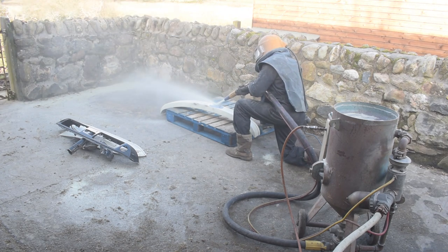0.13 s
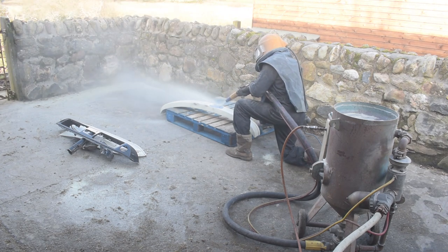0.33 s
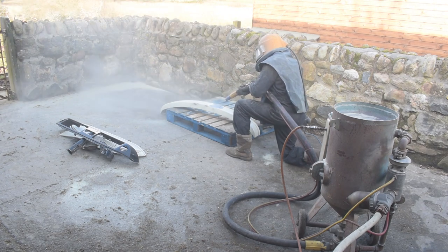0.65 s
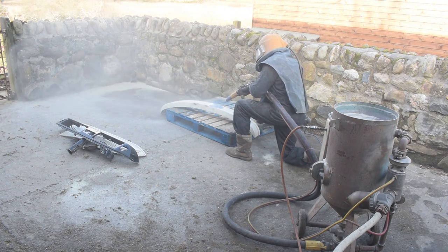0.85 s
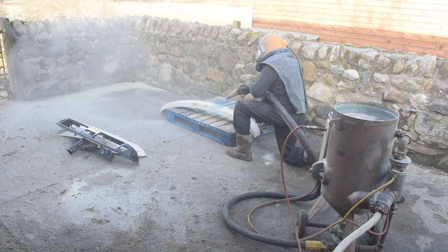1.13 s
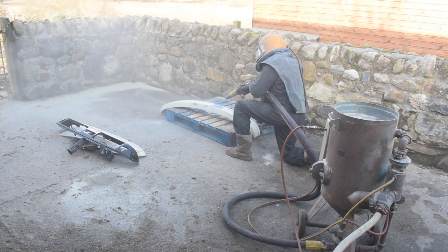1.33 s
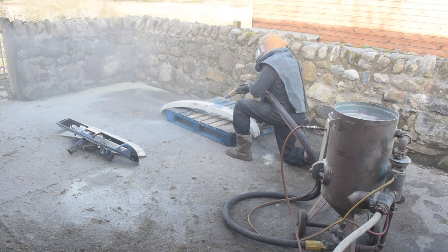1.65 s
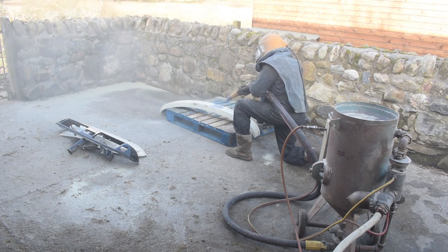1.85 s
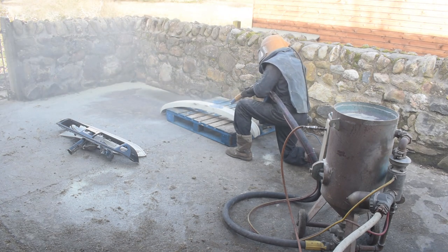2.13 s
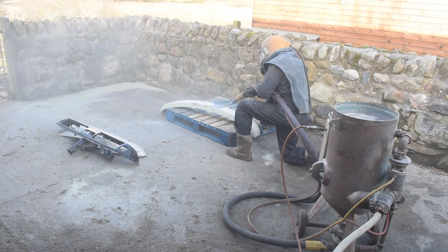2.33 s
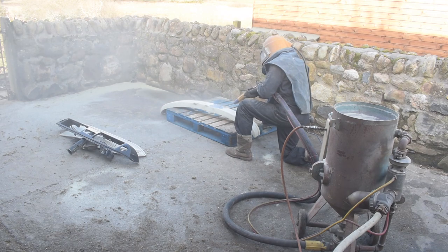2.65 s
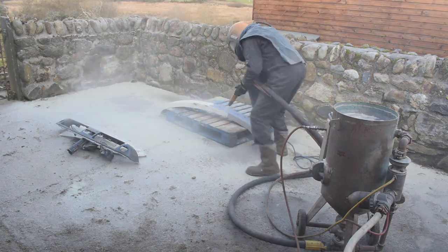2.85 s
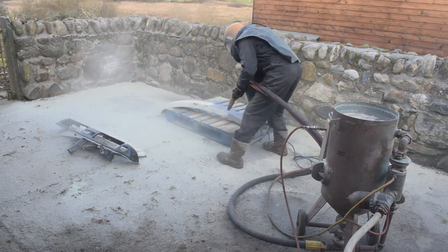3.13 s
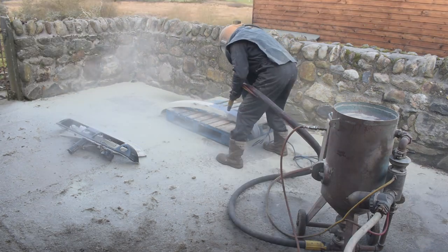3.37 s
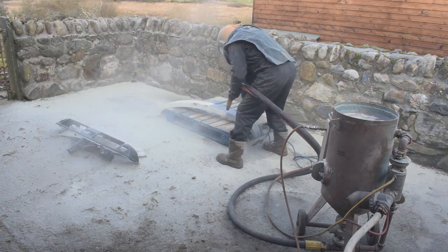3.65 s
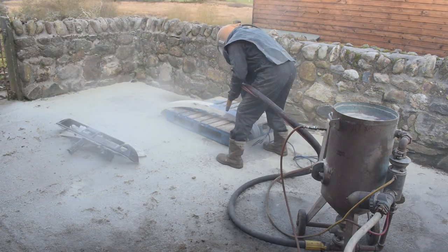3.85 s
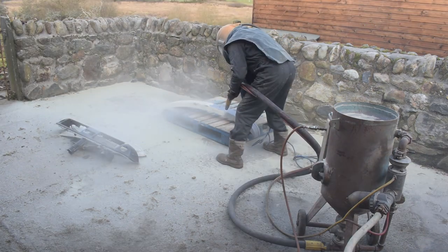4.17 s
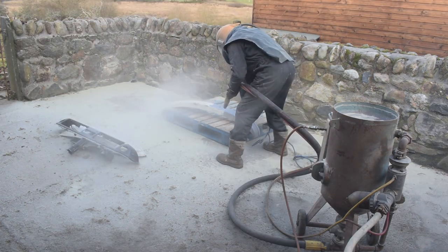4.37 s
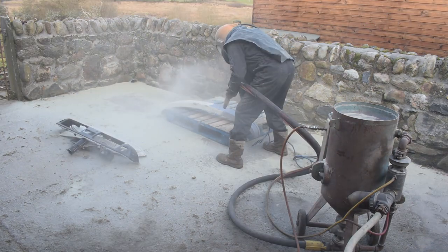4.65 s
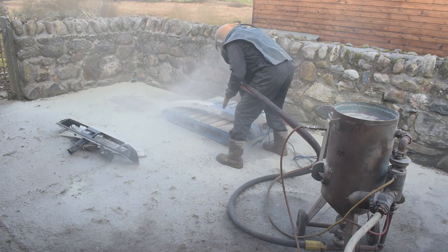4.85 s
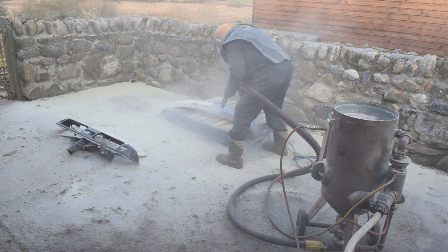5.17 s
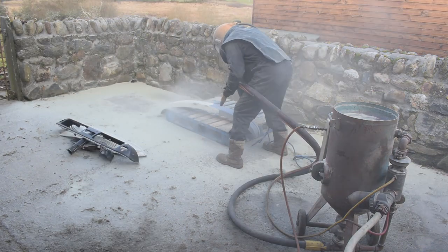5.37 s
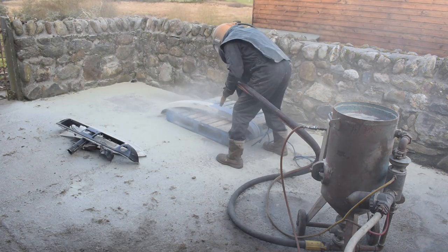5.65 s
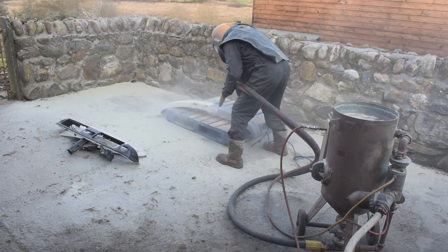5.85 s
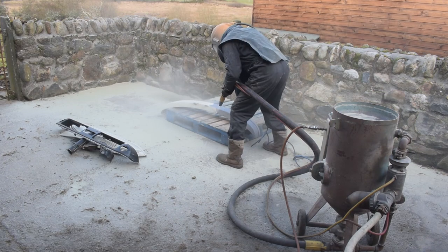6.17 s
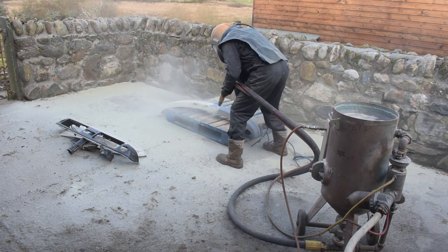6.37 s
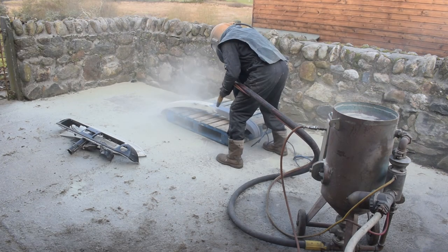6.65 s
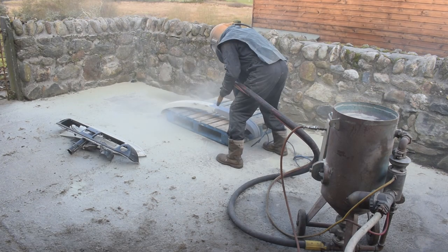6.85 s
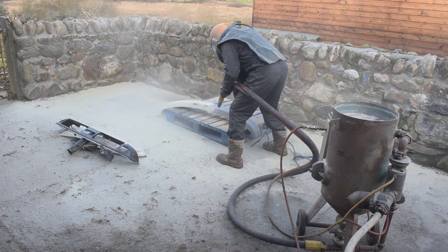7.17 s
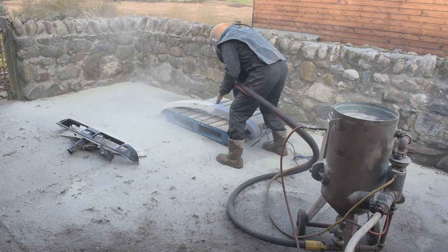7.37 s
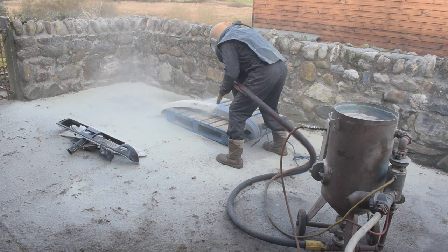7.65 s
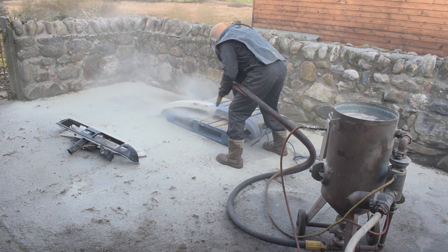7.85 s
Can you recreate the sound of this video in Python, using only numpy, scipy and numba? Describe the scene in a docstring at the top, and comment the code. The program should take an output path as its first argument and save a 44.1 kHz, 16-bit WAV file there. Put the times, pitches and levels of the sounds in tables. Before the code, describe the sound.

A loud, steady, bright hiss of sandblasting on a metal panel outdoors, beginning and ending with a duller air rush over compressor hum.

```python
"""A sandblasting jet plays on a car panel in a stone-walled yard.
Filtered noise makes its hiss and roar; resonances ring the panel and its hollows as the aim wanders.
At the start and near the end the hiss falls away, leaving a duller rush of air.
Then the compressor's hum, made of wavering harmonics and puffs of noise, stands out.
Short whistles from the panel edges and a few dull low bumps join in."""
import sys
import numpy as np
from scipy import signal
from scipy.fft import rfft, irfft, next_fast_len
from scipy.io import wavfile
from scipy.ndimage import uniform_filter1d
from numba import njit

SR = 44100
rng = np.random.default_rng(int(sys.argv[2]) if len(sys.argv) > 2 else 0)


def wav_record(signal):
    """Record a signal, one row per channel, as 16-bit PCM in the file named by sys.argv[1]."""
    frames = np.transpose(np.atleast_2d(signal))
    bounded = np.clip(frames, -1, 1)
    # unit amplitude maps onto the largest positive 16-bit level
    quanta = np.round(bounded * 32767).astype(np.int16)
    wavfile.write(sys.argv[1], SR, quanta)


N = 353238
TIME = np.arange(N) / SR

# slow drift of the jet as the worker shifts, before the changes and the lifts added in each layer: # [t/s,
# spray level/dB, impact level/dB, impact centre f/Hz, roar level/dB]
JET_DRIFT = [(0.5, -15.5, -12, 3350, -22.5), (1.2, -14.5, -11.5, 3640, -22.5), (1.8, -15, -11, 3730, -24.5),
             (2.1, -15, -12.5, 3800, -20.5), (2.7, -14, -13.5, 3740, -20.8), (3.1, -17, -11, 3380, -20.5),
             (3.65, -14, -11.5, 3970, -20.5), (3.9, -15, -12, 3850, -22), (4.45, -13, -10.5, 4030, -20),
             (4.7, -17, -13, 3680, -21.5), (5.15, -15.3, -10.5, 3650, -21.5), (5.5, -17, -10.5, 3550, -23),
             (6.05, -16, -10.3, 3470, -20.5), (6.75, -14, -10, 3610, -22.5), (7.05, -15.5, -11, 3250, -22),
             (7.6, -16, -10, 3150, -24)]
# how each noise of the jet responds to these changes: [change with air alone/dB, in the surge/dB, # in the
# dip/dB, share of a slip's fall/1, share of a dig's rise/1]
SPRAY_RESPONSE = (-10.5, 5.5, -12, 0.93, -0.11)
IMPACT_RESPONSE = (-8.5, 5.5, -17.5, 1.08, 0.2)
ROAR_RESPONSE = (0.5, 12.5, -8.5, 0.17, 1.12)
BUFFET_RESPONSE = (-6, 7, -11, -0.2, .5)
# the jet slips off the panel and the hiss fades: [t/s, half length/s, depth/dB]
SLIPS = [(.76, 0.068, 2.5), (3.22, 0.046, 3.5), (3.39, 0.033, 4), (3.5, 0.036, 6), (4.09, 0.07, 11),
         (4.31, 0.054, 3.5), (4.76, 0.051, 2), (4.96, 0.058, 3), (5.62, 0.053, 2.5), (6.22, 0.075, 8),
         (6.44, 0.094, 11.5), (7.0, 0.091, 2.5), (7.25, .03, 3)]
# the jet digs into a recess and roars: [t/s, half length/s, rise/dB]
DIGS = [(0.84, 0.08, 3), (3.344, 0.046, 3.5), (3.6, 0.031, 3), (4.276, 0.11, 4.5), (5.035, 0.073, 2),
        (6.538, 0.16, 8.5), (8.0, 0.11, 6)]
# relative spectra of the spray, the roar and the low buffeting: [f/Hz, level per Hz/dB]
SPRAY_SPECTRUM = [(2000, -28), (3500, -3.5), (5200, 0), (6500, 1.5), (8300, 1), (10000, -2.5), (12500, -9),
                  (15500, -15.5)]
ROAR_SPECTRUM = [(250, -27.5), (450, -12.5), (620, -7), (780, -3), (1100, -2), (1400, -.5), (2250, 2),
                 (2500, 2), (3200, -6), (4500, -33), (9000, -44)]
BUFFET_SPECTRUM = [(20, -28), (35, -26), (60, -31), (120, -24), (250, -15.5), (310, -6), (480, -0.5),
                   (600, -1.5), (900, -18)]
# standing resonances of the walled corner, negative boosts weaken a band: [f/Hz, width/Hz, boost/dB]
CORNER_RESONANCES = [(344, 31, 5), (466, 39, 5.5), (731, 12, 5), (914, 33, 4), (1070, 9, 2),
                     (1345, 37, 5.5), (1720, 20, 3.5), (2420, 59, -19), (7360, 160, -0.5)]
# hollows that sing when the jet blows across them, a negative boost absorbs:
# [start t/s, stop t/s, f/Hz, width before narrowing/Hz, mean boost/dB]
HOLLOWS = [(0, 0.303, 690, 260, -11), (0, .13, 1310, 100, 7.5), (0, .45, 2180, 140, 4.5),
           (.35, 0.435, 790, 230, 9), (0.382, .52, 2930, 280, 5.5), (2.22, 2.962, 3665, 110, 4.5),
           (3.55, 3.97, 3450, 160, 2.5), (4.144, 4.41, 2246, 159, 7.5), (4.38, 5.5, 4500, 150, 3.5),
           (5.05, 5.7, 7600, 200, 7), (6.222, 6.318, 2320, 100, 11), (6.45, 6.65, 1783, 65, 8),
           (6.832, 7.65, 2745, 75, 8), (7.82, 8.1, 1105, 70, 10.5), (7.858, 8.1, 1370, 90, 8),
           (7.878, 8.1, 1665, 89.9, 9)]
# resonances of the panel under the jet:
# [f/Hz, width before narrowing/Hz, mean boost while kneeling/dB, mean boost once standing/dB]
PANEL_RESONANCES = [(2240, 170, 0.5, 2), (2900, 115, 4.5, 1.5), (3106, 80, 5.5, 4), (3420, 100, -4, 0),
                    (3860, 200, 5.5, 0.5), (4320, 150, 4, 3), (4490, 170, 2, 2.5), (5080, 180, 0.5, 1.5),
                    (6060, 160, 5, 3), (6500, 93, -2, 5), (6930, 100, 2.5, 6), (7480, 110, 5.5, 1),
                    (7910, 190, -0.5, 5), (8210, 140, 6, 2)]
# compressor hum: [t/s, level/dB]
COMPRESSOR_LEVEL = [(0, -40), (.37, -41), (.6, -60), (2.5, -62), (4, -55), (7.68, -53), (7.78, -40.5),
                    (7.88, -36), (8.01, -34)]
# its mean speed: [t/s, firing rate f/Hz]
COMPRESSOR_SPEED = [(0, 71), (.4, 69.8), (1, 75.6), (7.6, 76), (8.01, 78.9)]
# its harmonics: [multiple of the firing rate/1, mean relative level/dB]
HARMONICS = [(1, 1), (2, 5.5), (3, -3), (4, 6), (5, 1), (6, 6), (7, -1), (8, 6), (14, -5)]
# relative spectrum of its engine noise: [f/Hz, level per Hz/dB]
CLATTER_SPECTRUM = [(30, -22), (60, -14), (110, -3), (150, 4), (220, 1), (320, -2), (500, -13), (1200, -3),
                    (4000, -26)]
# panel edges whistle in short puffs of air: [t/s, half length/s, lower tone level/dB, upper tone level/dB]
WHISTLE_PUFFS = [(.075, 0.038, -22, -28), (.226, 0.028, -17.3, -32), (0.33, .04, -28.5, -21.5)]
# mean pitches of the lower and upper whistle: [f/Hz]
WHISTLE_PITCHES = [931, 1047]
# dull low bumps: [t/s, half length/s, f/Hz, width of each of two filters/Hz, level/dB]
BUMPS = [(.42, .045, 45, 70, -45), (2.921, 0.0026, 160, 260, -29), (5.434, .035, 170, 150, -37.5),
         (6.616, 0.07, 111, 141, -44), (7.17, 0.017, 130, 150, -42)]
# gain on the sound that the two microphone ports do not share: [f/Hz, gain/dB]
SIDE_GAIN = [(60, -30), (150, -30), (350, -42), (700, -27), (1400, -36), (1900, -35), (2700, -14),
             (5500, -8.5), (9500, -7), (14000, -4)]

# grit joins the air stream with a surge; after it is shut off the level dips and recovers
GRIT_ON_S, GRIT_OFF_S = 0.3614, 7.635
ATTACK_S, RELEASE_S = 0.015, 0.073
SURGE_HOLD_S, SURGE_DECAY_S, RECOVER_S = 0.1, 0.13, 0.093
# the impact hiss drops in pitch with air alone, in the surge, in a recess and in a slip
AIR_DROP_HZ, SURGE_DROP_HZ, DIG_DROP_HZ_PER_DB, SLIP_DROP_HZ_PER_DB = 400, 400, 87, 16
STANDS_S, RISING_S = 2.65, 0.29  # the worker starts to stand up, and takes this long
SETTLE_S = 0.35  # the panel's resonances build up as the jet settles on it


def undb(db):
    """Turn decibels into gain."""
    return 10 ** (np.asarray(db) / 20)


def unit(x):
    """Scale a sound to rms 1."""
    return x / np.sqrt(np.mean(x ** 2))


def curves(table):
    """Join each column of a table by straight lines in time."""
    s, *columns = np.transpose(table)
    return [np.interp(TIME, s, column) for column in columns]


def ramp(start_s, length_s):
    """Rise from 0 to 1, then stay."""
    return np.clip((TIME - start_s) / length_s, 0, 1)


def swell(s, half_s):
    """Rise smoothly to 1 and fall again in a bell shape."""
    return np.exp(-.5 * ((TIME - s) / half_s) ** 2)


def fade(start_s, decay_s):
    """Stay at 1, then die away."""
    return np.exp(-np.maximum(TIME - start_s, 0) / decay_s)


def walk(rate):
    """Wander between random levels, `rate` of them a second, smoothed twice; the spread is near 1."""
    k = int(SR / rate)
    steps = np.repeat(rng.standard_normal(N // k + 1), k)
    smooth = uniform_filter1d(uniform_filter1d(steps, k), k)
    return unit(smooth[:N])


def colour(x, points):
    """Filter by a spectrum of (Hz, dB) points."""
    hz, db = np.transpose(points)
    size = next_fast_len(N, True)
    f = np.maximum(np.fft.rfftfreq(size, 1 / SR), 1)
    gain = undb(np.interp(np.log(f), np.log(hz), db))
    return irfft(rfft(x, size) * gain, size)[..., :N]


@njit
def sweep(x, hz, width):
    """A band-pass filter with a moving centre, where its gain is 1."""
    y = np.empty_like(x)
    for c in range(len(x)):
        band, low = 0., 0.  # the filter's two memories
        for i in range(x.shape[1]):
            g, k = np.tan(np.pi * hz[i] / SR), width / hz[i]
            v = (band + g * (x[c, i] - low)) / (1 + g * (g + k))
            band, low, y[c, i] = 2 * v - band, low + 2 * g * v, k * v
    return y


def resonate(x, hz, width_hz):
    """A fixed resonance, with gain 1 at its centre."""
    return signal.lfilter(*signal.iirpeak(hz, hz / width_hz, fs=SR), x)


def turbulence():
    """Two unrelated noises: what the ports share (mid) and what they do not (side)."""
    return rng.standard_normal((2, N))


def grit(per_s, scatter_db):
    """Countless grains strike at random, a few much harder than the rest."""
    strikes = rng.random(N) < per_s / SR
    force = undb(scatter_db * np.minimum(rng.exponential(size=N), 5))
    return unit(turbulence() * strikes * force)


def changes():
    """How the level changes over time: air alone, surge of grit, dip after shut-off (each 0-1), slips and digs
    (dB)."""
    opened, shut = ramp(GRIT_ON_S, ATTACK_S), ramp(GRIT_OFF_S, RELEASE_S)
    air = 1 - opened + shut
    surge = opened * fade(GRIT_ON_S + SURGE_HOLD_S, SURGE_DECAY_S)
    dip = shut * fade(GRIT_OFF_S + RELEASE_S, RECOVER_S)
    slip = sum(db * swell(s, half_s) for s, half_s, db in SLIPS)
    dig = sum(db * swell(s, half_s) for s, half_s, db in DIGS)
    return air, surge, dip, slip, dig


def spray_hiss():
    """Air noise and dense grain strikes, shaped into a fine hiss."""
    return unit(colour(turbulence() + 0.63 * grit(per_s=12000, scatter_db=2.2), SPRAY_SPECTRUM))


def impact_hiss(centre_hz):
    """Hiss of the impact spot, whose pitch moves with the angle and distance of the nozzle."""
    noise = turbulence() + .5 * grit(per_s=6000, scatter_db=2.5)
    width_hz = 3320.0  # of each of the two passes
    return unit(sweep(sweep(noise, centre_hz, width_hz), centre_hz, width_hz))


def jet():
    """Spray, impact hiss, roar of deflected air and low buffeting, each fluttering in level."""
    spray_db, impact_db, impact_hz, roar_db = curves(JET_DRIFT)
    air, surge, dip, slip, dig = changes()

    def response(shares):
        """Add up a layer's changes in dB."""
        return np.dot(shares, [air, surge, dip, -slip, dig])

    feed = walk(45)  # grit leaves the hose in uneven slugs
    tremble = walk(25)  # the nozzle shakes in the hand
    impact_hz = impact_hz - AIR_DROP_HZ * air - SURGE_DROP_HZ * surge
    impact_hz = impact_hz - DIG_DROP_HZ_PER_DB * dig - SLIP_DROP_HZ_PER_DB * slip

    # all in dB: drift, changes, a fixed lift where there is one, then flutter
    spray_db = spray_db + response(SPRAY_RESPONSE) + 1.13 + 0.34 * feed + 0.62 * tremble
    impact_db = impact_db + response(IMPACT_RESPONSE) + 0.17 * feed + 0.56 * tremble
    roar_db = roar_db + response(ROAR_RESPONSE) + 4.0 + 0.55 * walk(28)
    buffet_db = -35.5 + response(BUFFET_RESPONSE) + 1.1 * walk(14)

    spray = spray_hiss() * undb(spray_db)
    impact = impact_hiss(impact_hz) * undb(impact_db)
    roar = unit(colour(turbulence(), ROAR_SPECTRUM)) * undb(roar_db)
    buffet = unit(colour(turbulence(), BUFFET_SPECTRUM)) * undb(buffet_db)
    return spray + impact + roar + buffet


def corner(x):
    """The walls favour a few pitches wherever the nozzle points."""
    return x + sum((undb(db) - 1) * resonate(x, hz, width_hz) for hz, width_hz, db in CORNER_RESONANCES)


def hollows(x, fade_s, waver_db, drift):
    """Panel and hollows lift or absorb their own pitches in the jet noise, wavering with the aim."""
    out, wobble = x.copy(), walk(5)
    standing = ramp(STANDS_S, RISING_S)
    blasting = ramp(GRIT_ON_S, SETTLE_S) - ramp(GRIT_OFF_S, fade_s)
    rings = []
    for hz, width_hz, kneel_db, stand_db in PANEL_RESONANCES:
        rings.append((hz, width_hz, kneel_db + (stand_db - kneel_db) * standing, blasting))
    for start, stop, hz, width_hz, db in HOLLOWS:
        aim = ramp(start - fade_s / 2, fade_s) - ramp(stop - fade_s / 2, fade_s)
        rings.append((hz, width_hz, db, aim))
    for hz, width_hz, db, aim in rings:
        # each ring reads the same wobble from its own random places
        waver, bend = (np.roll(wobble, shift) for shift in rng.integers(N, size=2))
        band = sweep(x, hz * (1 + drift * bend), 0.65 * width_hz)
        out += (undb(db + waver_db * waver) - 1) * aim * band

    def power(v):
        """Power averaged over a short time."""
        return uniform_filter1d(v[0] ** 2, size=4096)

    # the rings take their energy from the jet, so the total level is kept
    return out * np.sqrt(power(x) / power(out))


def yard(x, echo_db, sway_ms, above_hz, count=5):
    """Short echoes off the panel and ground comb the treble; their paths shift as the nozzle sways."""
    treble = signal.sosfilt(signal.butter(2, above_hz, "high", fs=SR, output="sos"), x)
    out = x.copy()
    for channel in range(2):
        lags_ms = np.geomspace(2.1, 8, count) * rng.uniform(.85, 1.15, count)
        for lag_ms in lags_ms:
            lag_s = (lag_ms + sway_ms * walk(1.3)) / 1000
            read = np.arange(N) - lag_s * SR
            out[channel] += undb(echo_db) * np.interp(read, np.arange(N), treble[channel], left=0)
    return out / np.sqrt(1 + count * undb(echo_db) ** 2 / 2)


def compressor():
    """An engine-driven compressor: wavering harmonics, and a puff of noise with each firing."""
    firing_hz = curves(COMPRESSOR_SPEED)[0] * (1 + 0.0062 * walk(9.3))
    phase = 2 * np.pi * np.cumsum(firing_hz) / SR
    hum = np.zeros(N)
    for k, db in HARMONICS:
        hum += undb(db + 2.4 * walk(12)) * np.sin(k * phase + rng.uniform(0, 2 * np.pi))
    puffs = rng.standard_normal(N) * (1 + .7 * np.cos(phase))
    clatter = colour(puffs, CLATTER_SPECTRUM)
    return (unit(hum) + undb(-1) * unit(clatter)) * undb(curves(COMPRESSOR_LEVEL)[0])


def whistle():
    """Air on the panel edges makes two slightly unsteady tones that trade strength from puff to puff."""
    out = np.zeros(N)
    strengths = sum(np.outer(undb(tones_db), swell(s, half_s)) for s, half_s, *tones_db in WHISTLE_PUFFS)
    for hz, strength in zip(WHISTLE_PITCHES, strengths):
        phase = 2 * np.pi * np.cumsum(hz * (1 + 0.0096 * walk(71))) / SR
        out += np.sqrt(2) * np.sin(phase) * strength * undb(1.7 * walk(76))
    return out


def bumps():
    """Short swells of low, band-filtered noise under the hiss."""
    out = np.zeros(N)
    for s, half_s, hz, width_hz, db in BUMPS:
        body = resonate(resonate(rng.standard_normal(N), hz, width_hz), hz, width_hz)
        out += unit(body) * undb(db) * swell(s, half_s)
    return out


def scene():
    """The jet in its yard, straight ahead; the two ports agree most in the middle range and part in the treble."""
    blast = jet()
    # the panel rings straight ahead, so both ports share its pitches; scattered sound stays plain
    rung = hollows(corner(blast[:1]), fade_s=0.069, waver_db=1.9, drift=0.0057)
    paths = np.array([rung[0] * undb(-0.6), blast[1]])
    mid, side = yard(paths, echo_db=-12, sway_ms=.09, above_hz=2700)
    mid = mid + compressor() + whistle() + bumps()
    # the direct sound reaches the left port a fraction of a sample sooner
    lead = 0.095 * np.gradient(mid)
    side = colour(side, SIDE_GAIN) + lead
    return np.array([mid + side, mid - side])


def record(dry):
    """The loudest peaks overload the recorder, which also cuts the top."""
    clipped = np.clip(dry * undb(-.2), -1, 1)
    top_cut = signal.ellip(10, .1, 70, 15700, fs=SR, output="sos")  # steep cut above 15700 Hz
    return signal.sosfilt(top_cut, clipped)


dry = scene()
out = record(dry)
wav_record(out)
```